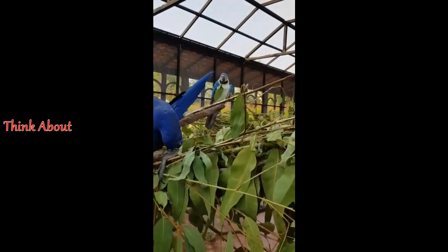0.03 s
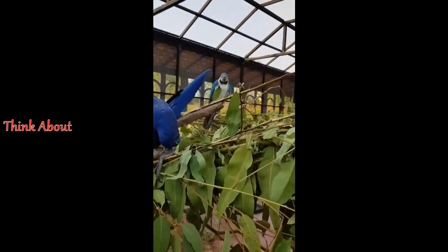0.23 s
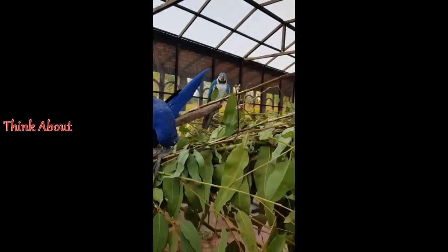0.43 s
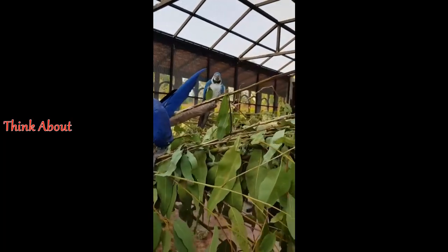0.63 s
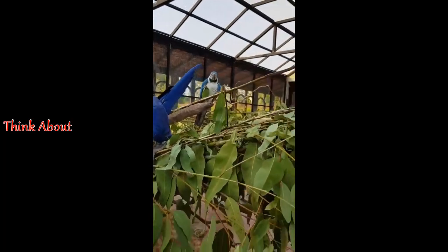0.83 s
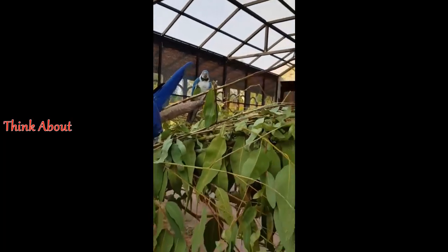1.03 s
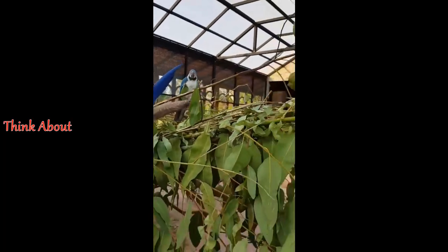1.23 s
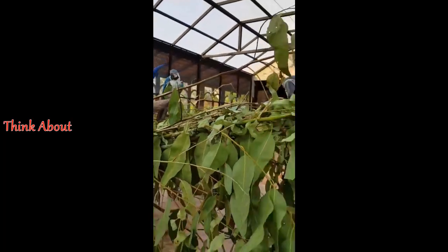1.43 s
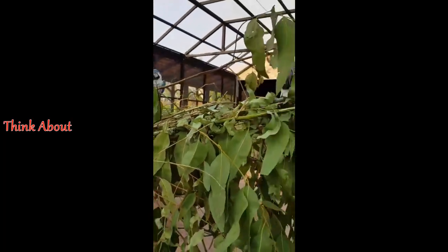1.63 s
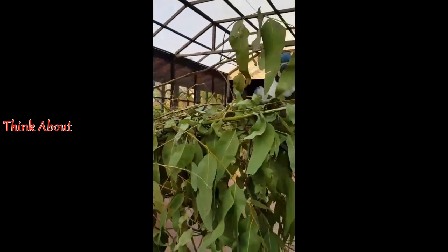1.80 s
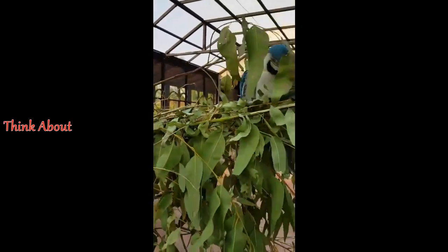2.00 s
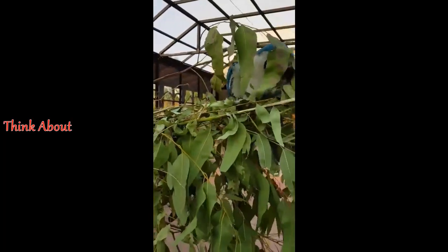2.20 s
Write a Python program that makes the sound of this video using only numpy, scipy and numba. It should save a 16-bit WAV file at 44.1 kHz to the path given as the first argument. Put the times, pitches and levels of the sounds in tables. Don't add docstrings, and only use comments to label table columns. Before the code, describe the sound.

One brief, gravelly parrot call breaks into throbs over leaf rustle, twig cracks and a low motor hum

```python
import sys
import numpy as np
from scipy import signal
from scipy.fft import rfft, irfft
from scipy.io import wavfile
from numba import njit

SR = 44100
rng = np.random.default_rng(int(sys.argv[2]) if len(sys.argv) > 2 else 0)


def transcribe(u):
    v = np.clip(np.atleast_2d(u).T, -1, 1)
    q = np.round(v * 32767).astype(np.int16)
    wavfile.write(sys.argv[1], SR, q)


def magnitude_from_level(level_db):
    exponent = np.asarray(level_db, float) / 20
    return 10 ** exponent


N = 99577
THROB_HZ = 264


def rms_one(x):
    return x / np.sqrt(np.mean(x ** 2) + 1e-20)


def at_hz(points, hz):
    points_hz, points_db = np.transpose(points)
    return np.interp(np.log(hz), np.log(points_hz), points_db)


def drift(rate_hz):
    r = np.exp(-80 * np.pi * rate_hz / SR)
    slow = signal.lfilter([1], [1, -2 * r, r * r], rng.standard_normal(N // 40 + 2002))
    slow = slow[2000:]
    return np.interp(np.arange(N) / 40, np.arange(len(slow)), rms_one(slow))


@njit
def resonate(x, bend, r):
    out = np.zeros(len(x))
    for i in range(2, len(x)):
        out[i] = x[i] - x[i - 2] * r + bend[i] * out[i - 1] - r * r * out[i - 2]
    return out / 2


def resonance(x, hz, width_hz):
    r = np.exp(-np.pi * width_hz / SR)
    return resonate(x, 2 * r * np.cos(2 * np.pi * hz / SR) * np.ones(len(x)), r)


def placed(x, pan_db, lag_s):
    turn = np.exp(-2j * np.pi * np.fft.rfftfreq(len(x), 1 / SR) * lag_s)
    right = irfft(rfft(x) * turn, len(x))
    return np.array([x * magnitude_from_level(pan_db / 2), right * magnitude_from_level(-pan_db / 2)])


def pulses():
    # (time [s], level [dB], pulse rate [Hz], beak opening [0-1])
    rasp = [
        (1.0347, -27, 291.7, 1.0),
        (1.047, -34, 275.6, 1),
        (1.065, -31.5, 259.9, 0.59),
        (1.092, -34.5, 251.4, 0.4),
        (1.111, -37, 229.3, 0.04),
        (1.139, -36.5, 220, 0.15),
        (1.178, -32, 213.9, 0.23),
        (1.199, -31, 200.7, 0.38),
        (1.217, -36, 197, 0.38),
    ]
    # (time [s], strong part length [s], level [dB], beak opening [0-1], brightness [dB])
    throbs = [
        (1.2229, .005, -28, 0.55, -9),
        (1.2427, .009, -24.5, 0.47, -3),
        (1.2688, .001, -33, .45, -6),
        (1.2724, .009, -24, 0.47, -1),
        (1.2927, .001, -32, .5, -4),
        (1.2993, .012, -25, 0.5, 0),
        (1.3178, .001, -32, .5, -3),
        (1.3262, .001, -29.5, .5, -4),
        (1.3308, .013, -26, 0.55, -1),
        (1.3667, .005, -35, 1.0, -12),
    ]
    lull_hz, lull_db, lull_max_s = 209, -14, .019
    throb_swell_db, lull_dull_db = 3, -6
    at, db, hz, opening = np.transpose(rasp)
    rows, s = [], at[0]
    while s < at[-1]:
        rows.append((s, np.interp(s, at, db), np.interp(s, at, opening), 0, 0))
        s += 1 / np.interp(s, at, hz)
    next_s = [row[0] for row in throbs[1:]] + [np.inf]
    for (s, length_s, level_db, beak, bright_db), after in zip(throbs, next_s):
        end = s + length_s
        lull_s = lull_max_s if after - end < lull_max_s + 1 / lull_hz else 1 / lull_hz
        while s < min(after - .5 / THROB_HZ, end + lull_s):
            lull = s > end
            change_db = lull_dull_db if lull else throb_swell_db * (.5 - (end - s) / length_s)
            rows.append((s, level_db + lull_db * lull, beak, 1, bright_db + change_db))
            s += 1 / (lull_hz if lull else THROB_HZ)
    return np.transpose(rows)


def parrot():
    # (beak-shut centre [Hz], beak-open centre [Hz], width [Hz], rasp level [dB], throb level [dB])
    throat = [(204, 285, 147, -11, -15.5), (433, 630, 225, -5.5, -9.5), (746, 1167, 180, 1.5, 1),
              (1510, 2070, 287, -1, -1.5), (2360, 2400, 330, -3, -5), (3170, 3200, 280, -2, 1),
              (3860, 3710, 260, -4.5, -2.5), (6070, 6430, 345, -15, -8.5), (7140, 7750, 990, -6, -6.5),
              (8900, 9600, 1800, -27, -6), (11384, 11000, 2590, -12, -8)]
    jitter, spread_db = .045, 2
    alternate_db = 3.5
    puff_decay_s, raspiness, top_raspiness, top_click_share = .0018, .13, .3, .35
    throb_steadier = .45
    open_bright_db = 7.5
    valley_hz, valley_width_hz = 4850, 1100

    s, db, opening, throb, bright_db = pulses()
    t = np.arange(N) / SR
    chance = rng.standard_normal((200, 2))[:len(s)]
    chance = chance * (1 - throb_steadier * throb)[:, None]
    db = db + alternate_db * (-1) ** np.arange(len(s)) * np.clip(1 - 2 * opening, 0, 1)
    clicks = np.zeros(N) + 1e-18
    click_s = s + chance[:, 0] * jitter / THROB_HZ
    clicks[(click_s * SR).astype(int)] = magnitude_from_level(db + spread_db * chance[:, 1] + 9)
    puff = signal.lfilter([1], [1, -np.exp(-1 / (puff_decay_s * SR))], clicks)
    puff = puff * rng.standard_normal(N)

    beak, throbbing, bright_db = [np.interp(t, s, track) for track in (opening, throb, bright_db)]
    low = clicks + raspiness * (1 - throb_steadier * throbbing) * puff
    mid = low * magnitude_from_level(bright_db / 2)
    top = (top_click_share * clicks + top_raspiness * puff) * magnitude_from_level(bright_db)
    voice = 0
    for k, (shut_hz, open_hz, width_hz, rasp_db, throb_db) in enumerate(throat):
        drive = top if k > 6 else mid if k > 4 else low
        level_db = rasp_db + (throb_db - rasp_db) * throbbing
        if k > 3:
            level_db = level_db + open_bright_db * (beak - 1) * (1 - throbbing)
        ring = resonance(drive, shut_hz + (open_hz - shut_hz) * beak, width_hz)
        voice = voice + (-1) ** k * magnitude_from_level(level_db) * ring
    edges_hz = [valley_hz - valley_width_hz / 2, valley_hz + valley_width_hz / 2]
    valley = signal.butter(2, edges_hz, "stop", fs=SR, output="sos")
    low_cut = signal.butter(2, 170, "high", fs=SR, output="sos")
    return signal.sosfilt(np.vstack([valley, low_cut]), voice)


def aviary(x):
    nearby_t60_s, aviary_t60_s, far_echo_db = .035, 0.49, -26
    t = np.arange(SR) / SR
    decay = magnitude_from_level(-60 * t / nearby_t60_s) + magnitude_from_level(far_echo_db - 60 * t / aviary_t60_s)
    tail = rng.standard_normal((2, SR)) * decay * np.clip(t / 0.0028, 0, 1)
    tail = signal.sosfilt(signal.butter(1, [300, 3950], "band", fs=SR, output="sos"), tail)
    tail = tail / np.sqrt(np.sum(tail ** 2) / 2)
    return signal.fftconvolve(x[None], tail, axes=1)[:, :N]


def snaps():
    # (time [s], peak level [dB], pan [dB], echo send [dB])
    cracks = [
        (0.2657, -19.5, 5.5, -11),
        (0.7130, -7.5, 1.5, -16),
        (1.7771, -13.5, -3, -9),
    ]
    # (centre [Hz], width [Hz], level [dB])
    crack_modes = [
        [(1590, 205, -4), (2540, 210, 1.5), (4300, 430, -1.5), (7260, 160, -14), (9000, 460, -17),
         (11700, 400, -28)],
        [(2270, 330, -2.5), (4000, 340, -2), (5040, 280, -4.5), (7140, 170, 2), (9580, 260, 1.5),
         (10800, 150, -4), (12400, 490, -12), (14600, 510, -17)],
        [(925, 106, -10), (1390, 170, -18), (2210, 140, -3), (3360, 290, 5), (4100, 780, -9.5),
         (6060, 560, -10), (7900, 1500, -22), (11800, 660, -10), (13300, 500, -22)],
    ]
    right_lags_s = .0002, .00046, -.00007
    touch_decay_s, grit = 0.00039, 0.27
    out, send = np.zeros((2, N)), np.zeros(N)
    for (s, db, pan_db, echo_db), lag_s, modes in zip(cracks, right_lags_s, crack_modes):
        touch = np.zeros(2048)
        touch[100:] = grit * rng.standard_normal(1948) * np.exp(-np.arange(1948) / SR / touch_decay_s)
        touch[100] = 1
        snap = 0
        for k, (hz, width_hz, level_db) in enumerate(modes):
            snap = snap + (-1) ** k * magnitude_from_level(level_db) * width_hz * resonance(touch, hz, width_hz)
        snap = snap / np.abs(snap).max() * magnitude_from_level(db)
        i = int(s * SR) - 100
        out[:, i:i + len(snap)] += placed(snap, pan_db, lag_s)
        send[i:i + len(snap)] += magnitude_from_level(echo_db) * snap
    return out, send


def ticks():
    # (time [s], peak level [dB], ring [Hz], pan [dB], right lag [s])
    twig_ticks = [
        (.4798, -27.5, 5150, 12, 0.00019),
        (0.7205, -28.5, 2430, 14, 0.000074),
        (1.3734, -19.5, 7600, -3, 0.000095),
        (1.482, -27, 4100, 11, 0.000192),
        (1.498, -35, 4040, 7, .0002),
    ]
    # (ratio to ring [1], level [dB], sharpness Q [1])
    twig = [(.3, -27, 9), (.6, -16, 1.55), (1.0, 9, 7.1), (1.22, -12, 8.2), (1.75, 8, 8.4), (2.4, 0, 4.7),
            (3.1, -2.5, 4.5)]
    touch_decay_s = 0.0014
    out = np.zeros((2, N))
    for s, db, hz, pan_db, lag_s in twig_ticks:
        touch, colour_db = np.zeros(2048), rng.normal(0, 3, len(twig))
        touch[100:] = rng.standard_normal(1948) * np.exp(-np.arange(1948) / SR / touch_decay_s)
        tick = 0
        for (ratio, level_db, sharp), c_db in zip(twig, colour_db):
            ring = resonance(touch, min(hz * ratio, 15000), hz * ratio / sharp)
            tick = tick + magnitude_from_level(level_db + c_db) * ring
        i = int(s * SR) - 100
        out[:, i:i + len(tick)] += placed(tick / np.abs(tick).max() * magnitude_from_level(db), pan_db, lag_s)
    return out


def banded(white, spectrum, patchy_db):
    # (frequency [Hz], correlation [-1 to 1])
    likeness = [(60, 1), (180, 0.93), (550, 0.74), (1650, 0.24), (4970, -0.0), (15000, 0.34)]
    out, edges_hz = 0, 80 * 2 ** np.arange(0, 8.1, .5)
    for k, (low, high) in enumerate(zip(edges_hz, edges_hz[1:])):
        band = signal.butter(2, [low, high], "band", fs=SR, output="sos")
        mid, side = signal.sosfilt(band, white[k % 2])
        hz = np.sqrt(low * high)
        alike = np.clip(at_hz(likeness, hz), -1, 1)
        gain = magnitude_from_level(at_hz(spectrum, hz) + patchy_db * drift(11.9))
        out = out + gain * (np.sqrt(1 + alike) * mid + np.sqrt(1 - alike) * side * [[1], [-1]])
    return rms_one(out)


def leaves():
    # (time [s], level [dB])
    stir = [(0, -41), (.06, -50), (.16, -59), (.23, -46.5), (.34, -51), (.45, -49.5), (0.491, -41),
            (.56, -42.5), (0.628, -53.5), (.7, -42), (.76, -47), (.84, -46), (1.0, -45.5), (1.42, -51.5),
            (1.491, -48.5), (1.602, -64), (1.69, -51), (1.749, -56.5), (2.258, -56.5)]
    # (frequency [Hz], density [dB per Hz])
    leaf_spectrum = [(290, -31), (500, -5), (868, -6), (2460, 2), (2980, -4.5), (4600, 0.5), (5710, -3),
                     (12500, -6.5), (16000, -14)]
    level_db, waver_db, crackles_per_s, crackle_db = 4.5, 3.14, 990, -8
    s, db = np.transpose(stir)
    signs = rng.choice([-1, 1], (2, 2, N))
    crackle = rms_one(signs * (rng.random(N) < crackles_per_s / SR))
    white = rng.standard_normal((2, 2, N)) + magnitude_from_level(crackle_db) * crackle
    gain = magnitude_from_level(np.interp(np.arange(N) / SR, s, db) + level_db + waver_db * drift(9.3))
    return gain * banded(white, leaf_spectrum, patchy_db=0.0)


def branch():
    # (time [s], decay [s], centre [Hz], width [Hz], level [dB])
    rubs = [
        (-.02, .2, 1450, 500, -49),
        (1.675, .07, 950, 300, -48),
    ]
    rumble_band = signal.butter(2, [34, 48], "band", fs=SR, output="sos")
    out = magnitude_from_level(-63) * rms_one(signal.sosfilt(rumble_band, rng.standard_normal(N)))
    for s, decay_s, hz, width_hz, db in rubs:
        t = np.arange(N) / SR - s
        shape = np.clip(t / 0.013, 0, 1) * np.exp(-np.maximum(t, 0) / decay_s)
        out = out + magnitude_from_level(db) * shape * rms_one(resonance(rng.standard_normal(N), hz, width_hz))
    return out


def hum():
    # (frequency [Hz], density [dB per Hz])
    air_spectrum = [(47, -34), (80, -5.5), (127, -23), (194, -17), (422, -27.5), (493, -30), (802, -25.5),
                    (2490, -23), (16000, -36)]
    motor_waver_db = 0.57
    t = np.arange(N) / SR
    motors = 0
    for hz, db, fade_db in [(53.76, -42.5, -3.5), (65.85, -40.5, -2.5)]:
        gain = magnitude_from_level(db + fade_db * t / t[-1] + motor_waver_db * drift(6.7))
        motors = motors + gain * np.sin(2 * np.pi * hz * t)
    motors = motors * magnitude_from_level(motor_waver_db * drift(2.9) * [[.5], [-.5]])
    mains = magnitude_from_level(-58 + 2.5 * drift(0.9)) * np.sin(2 * np.pi * 100.3 * t)
    insects = [resonance(n, hz=4650, width_hz=150) for n in rng.standard_normal((2, N))]
    insects = magnitude_from_level(-63) * rms_one(np.array(insects))
    air = banded(rng.standard_normal((2, 2, N)), air_spectrum, patchy_db=3.0)
    air = magnitude_from_level(-46 - 3.5 * t / t[-1]) * air
    return motors + mains + air + insects


def scene():
    call, small, (loud, send) = parrot(), ticks(), snaps()
    near = placed(call, pan_db=1, lag_s=0.00017)
    near[1] = signal.sosfilt(signal.butter(1, 2750, fs=SR, output="sos"), near[1])
    echoes = aviary(magnitude_from_level(-8.5) * call + magnitude_from_level(-13.5) * small[0] + send)
    return near + echoes + small + loud + leaves() + hum() + branch()


def band_limit(x):
    return signal.sosfilt(signal.butter(12, 16490, fs=SR, output="sos"), x)


def record(dry):
    overload = .6
    rounded = overload * np.tanh(dry / overload)
    mix = signal.sosfilt(signal.cheby2(12, 60, 16400, fs=SR, output="sos"), rounded)
    return band_limit(mix)


dry = scene()
out = record(dry)
transcribe(out)
```